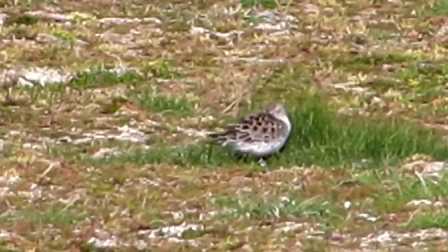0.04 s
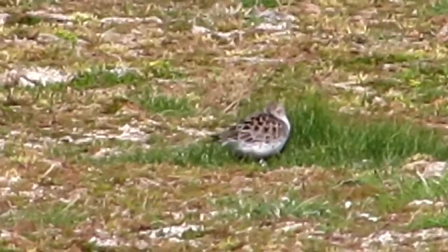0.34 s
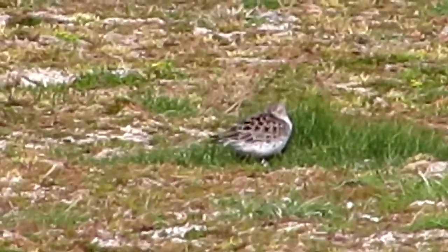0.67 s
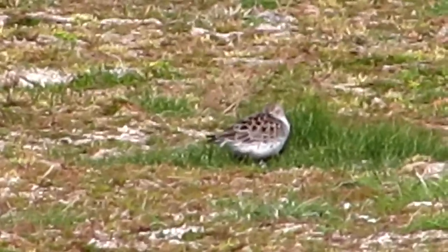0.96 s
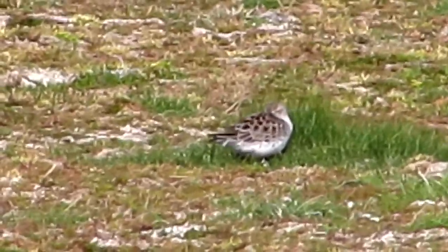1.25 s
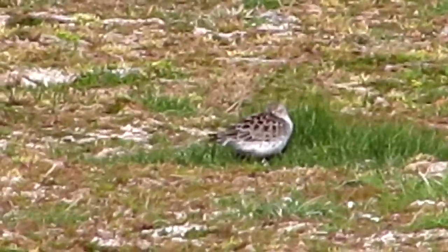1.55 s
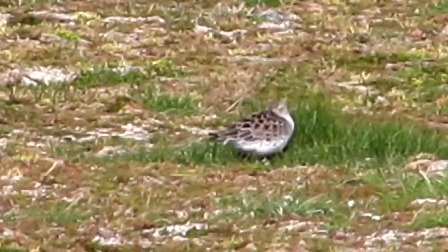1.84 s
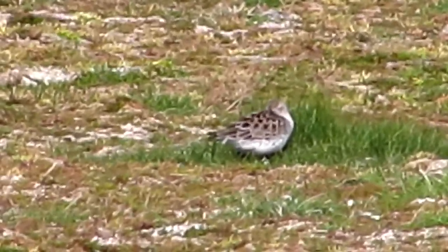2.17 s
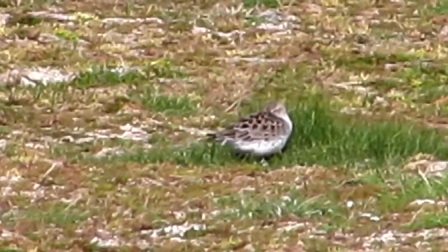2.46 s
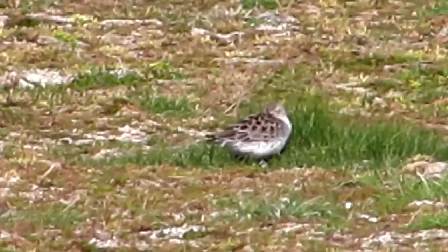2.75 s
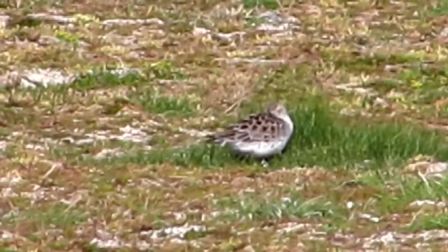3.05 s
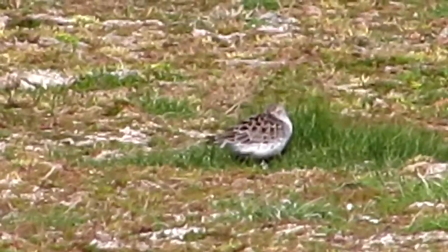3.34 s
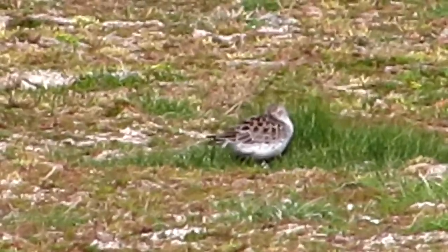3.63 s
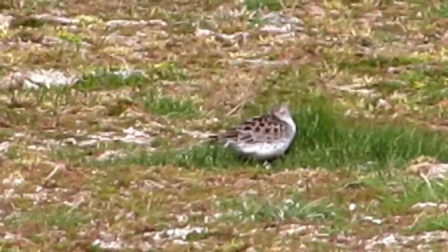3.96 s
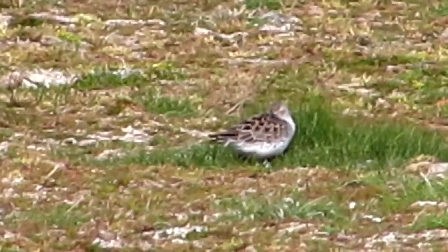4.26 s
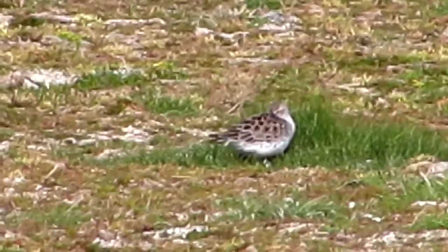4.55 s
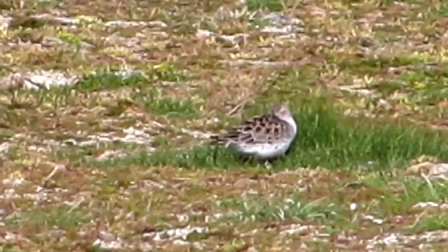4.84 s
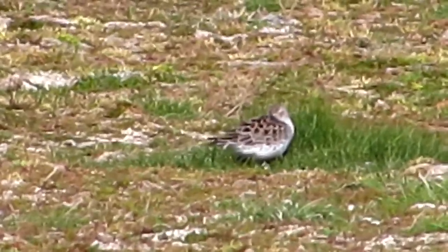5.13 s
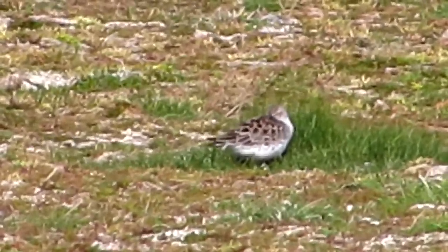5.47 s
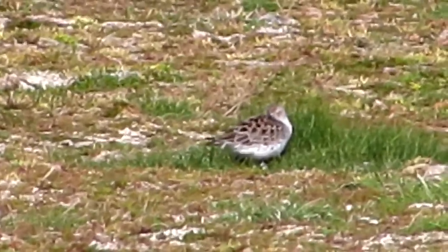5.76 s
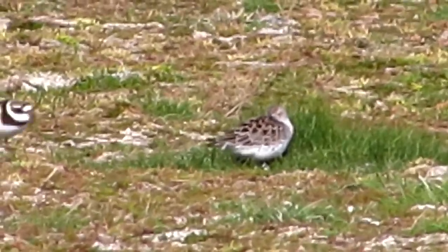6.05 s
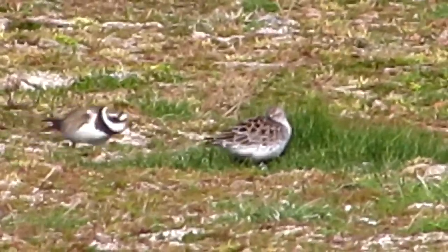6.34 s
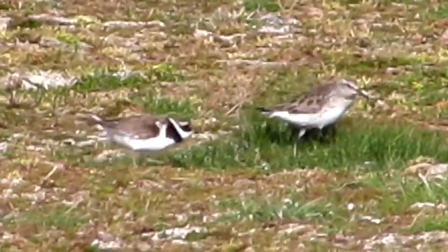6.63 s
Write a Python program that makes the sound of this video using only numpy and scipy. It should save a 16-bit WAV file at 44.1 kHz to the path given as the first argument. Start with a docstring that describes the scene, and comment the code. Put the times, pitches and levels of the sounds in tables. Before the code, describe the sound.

Uneven wind rumble slaps and crackles on the microphone, drops briefly to faint hiss and far twitters, then returns.

```python
"""Gusty wind buffets a camera's stereo microphone on open, short-grazed ground.
From the start, gusts ride on a light breeze. Their eddies (swirls of air) push the two channels in
opposite directions; small ones pop and crackle, hard ones slap, amid a few soft rustles and ticks.
Near 2.7 s the wind drops, and a faint hiss and far birds come through. The gusts soon return,
land their hardest slap near 3.7 s and blow on until they ease at the very end."""
import sys
import numpy as np
from scipy import signal
from scipy.fft import rfft, irfft
from scipy.io import wavfile
from scipy.ndimage import uniform_filter1d, minimum_filter1d, map_coordinates

SR = 44100
rng = np.random.default_rng(int(sys.argv[2]) if len(sys.argv) > 2 else 0)


def inscribe(sig):
    """Save sig as 16-bit PCM at rate SR to the path in sys.argv[1].

    A 1-D sig is mono; a 2-D sig holds one channel per row.
    Samples are clipped to [-1, 1] before scaling.
    """
    pcm = np.round(np.clip(np.atleast_2d(sig).T, -1, 1) * 32767)
    wavfile.write(sys.argv[1], SR, pcm.astype(np.int16))


N = 295470
TIME = np.arange(N) / SR

# Tight eddies that hit the microphone's openings head on: t/s, level/dB, corner f/Hz
# (the higher the corner frequency, the brighter the sound)
SLAPS = [(0.31, -9, 467), (0.36, -5.5, 332), (0.467, -9.5, 421), (0.483, -8.5, 359), (0.553, -3.5, 268.3),
         (0.574, -4.5, 325), (0.71, -12.5, 535.2), (0.832, -6, 378.3), (0.852, -4, 170.4),
         (0.84, -6.5, 700.8), (0.922, -11.5, 582), (1.022, -9.0, 116.6), (1.07, -8.5, 437.4),
         (1.266, -13, 380.6), (1.338, -16, 339), (1.366, -18, 300), (1.427, -18, 329.9),
         (1.552, -17.5, 189.3), (1.726, -11.5, 285.8), (1.806, -11.5, 285.7), (1.864, -9, 400.4),
         (1.928, -5.5, 418.9), (1.982, -10, 690.4), (2.061, -6.0, 514.4), (2.073, -7.5, 680),
         (2.205, -12.5, 369.5), (2.57, -13, 347), (3.062, -17.5, 188.8), (3.284, -15, 250.8),
         (3.309, -5, 316.7), (3.447, -3, 307.9), (3.533, -6.5, 359.8), (3.57, -6.5, 380.8),
         (3.657, 0.5, 176), (3.66, -1.5, 444.5), (3.677, -9.5, 488.3), (3.821, -12.5, 386.5),
         (3.9, -7.5, 373.2), (3.954, -11.5, 540), (4.017, -7.0, 153.7), (4.066, -13.0, 368.6),
         (4.259, -3, 420.8), (4.283, -7.5, 327), (4.338, -16, 599), (4.469, -6, 511.4),
         (4.518, -10.5, 421.1), (4.647, -9, 426.6), (4.69, -6.5, 524.5), (4.759, -8.0, 284.5),
         (4.871, -2, 229.9), (4.914, -6.5, 726), (5.012, -4.5, 520), (5.104, -7.5, 544.3),
         (5.259, -6.0, 460.4), (5.319, -14, 801.2), (5.435, -1.5, 679.3), (5.638, -10, 563.2),
         (5.768, -12.5, 394.2), (5.822, -8, 129.5), (5.888, -6.0, 596.3), (5.943, -8.0, 491.2),
         (6.034, -7, 90), (6.073, -7.5, 499), (6.16, -6.5, 649.3), (6.213, -10.5, 475.4),
         (6.332, -11, 382.1), (6.421, -9.5, 436.9), (6.491, -12.5, 442.7), (6.515, -11.5, 492.9),
         (6.598, -18, 263)]


def amp(db):
    """Turns decibels into a gain."""
    return 10 ** (np.asarray(db) / 20)


def unit(x):
    """Scales a signal to an average power of one."""
    return x / np.sqrt(np.mean(x ** 2) + 1e-20)


def curve(rows):
    """Joins (time, value) points with straight lines."""
    return np.interp(TIME, *np.transpose(rows))


def flutter(slow_hz, fast_hz):
    """Random wavering between two rates, with its extremes rounded off."""
    hz = np.fft.rfftfreq(N, 1 / SR)
    shape = hz / (hz ** 2 + slow_hz ** 2) ** 0.791 * np.exp(-(hz / fast_hz) ** 2)
    wavering = unit(irfft(rfft(rng.standard_normal(N)) * shape, N))
    return 2 * np.tanh(wavering / 2)


def filtered(x, hz, kind, order):
    """Keeps the "low" or the "high" side of a frequency."""
    return signal.sosfilt(signal.butter(order, min(hz, .49 * SR), kind, fs=SR, output="sos"), x)


def stereo_noise(spectrum, width):
    """Steady noise shaped by (f/Hz, level/dB) points; width sets how unlike left and right are."""
    hz, db = np.transpose(spectrum)
    shape = amp(np.interp(np.log(np.fft.rfftfreq(N, 1 / SR) + 1), np.log(hz), db))
    mid, side = [unit(irfft(rfft(rng.standard_normal(N)) * shape, N)) for _ in range(2)]
    return np.array([mid + width * side, mid - width * side])


def air():
    """Faint hiss of the open ground, with a far drone in it."""
    # Tone of the hiss, with a peak for the drone: f/Hz, level/dB
    spectrum = [(100, 1), (600, -1), (740, -1.5), (860, 9), (1030, -3.5), (1900, -7.5), (3400, -11),
                (4000, -16.5), (4800, -13), (7000, -17.5), (8000, -20), (11000, -20), (13500, -25),
                (15500, -44)]
    # Slow rise and fall of the hiss: t/s, level/dB
    levels = [(0, -70), (1.0, -78), (1.2, -72.5), (2.0, -69.5), (2.7, -73), (3.5, -71.5), (4.5, -79),
              (5.2, -78), (5.7, -72), (6.7, -72.5)]
    return amp(curve(levels) + flutter(slow_hz=4, fast_hz=15)) * stereo_noise(spectrum, width=0.74)


def glide(hz, fade):
    """A tone that follows a changing pitch, fading in and out."""
    return unit(np.sin(2 * np.pi * np.cumsum(hz) / SR) * signal.windows.tukey(len(hz), fade))


def birds(whistle_db=-72.5, twitter_db=2.5, echo_db=-5.5, echo_s=.2):
    """Buzzy twitters and one clear whistle off to the left, blurred by distance."""
    # Short sliding notes: t/s, length/s, level/dB, buzz/share of pitch, start f/Hz, end f/Hz
    notes = [(2.533, 0.11, -81, 0.065, 4836, 4207), (2.863, .13, -82.5, .012, 3660, 3190),
             (2.97, 0.048, -79, 0.021, 2185, 2071), (3.035, 0.032, -76, 0.013, 2352, 2347),
             (3.131, 0.024, -75.5, 0.05, 2280, 2450), (3.235, 0.062, -82, .006, 1780, 1800),
             (3.359, 0.025, -72.5, 0.021, 2603, 2345), (3.377, .042, -74, 0.013, 2170, 2020),
             (3.485, 0.045, -81.5, 0.044, 4650, 4472), (3.63, 0.044, -81, 0.038, 4891, 4653),
             (4.109, 0.045, -78, 0.0096, 1755, 2030), (4.528, 0.043, -81, .015, 3104, 3090),
             (4.693, .035, -78.5, 0.045, 4792, 4729), (5.635, 0.073, -77.5, .11, 4658, 5070)]
    # A whistle that rises, then slides down: t/s, f/Hz
    whistle = [(3.23, 3375), (3.262, 3658), (3.292, 3730), (3.315, 3200), (3.36, 3010), (3.44, 2830)]
    song = np.zeros(N)
    wobble = flutter(slow_hz=90, fast_hz=300)
    for start, length, db, buzz, start_hz, end_hz in notes:
        hz = np.linspace(start_hz, end_hz, round(length * SR))
        at = round(start * SR) + np.arange(len(hz))
        song[at] += amp(db) * glide(hz * (1 + buzz * wobble[at]), fade=.5)
    song *= amp(twitter_db * flutter(slow_hz=40, fast_hz=90))  # breaks the notes into syllables
    calling = (TIME > whistle[0][0]) & (TIME < whistle[-1][0])
    song[calling] += amp(whistle_db) * glide(curve(whistle)[calling], fade=.4)
    t = TIME[:SR // 2]
    scatter = rng.standard_normal((2, len(t))) * np.exp(-np.log(1000) * t / echo_s)
    echo = signal.fftconvolve(song[None], scatter / np.linalg.norm(scatter[0]), axes=1)[:, :N]
    return song * amp([[2], [-8]]) + amp(echo_db) * echo


def rustles(grain_db=3.5):
    """Soft rustles near the camera: short swells of grainy high noise."""
    # Swells: middle t/s, level/dB, half length/s
    swells = [(0.144, -68.5, 0.016), (0.307, -68.5, 0.0063), (0.446, -61, 0.029), (0.55, -70.5, 0.02),
              (2.904, -77, 0.071), (5.422, -65.5, 0.034), (5.869, -77, 0.028)]
    # Their tone: f/Hz, level/dB
    spectrum = [(800, -10.0), (2500, 5.5), (4500, 0.5), (6300, 0.5), (7800, -12.0), (10000, -7.5),
                (13000, -14.5), (15500, -36)]
    loudness = sum(amp(db) * np.exp(-.5 * ((TIME - when) / half) ** 2) for when, db, half in swells)
    grain = amp(grain_db * flutter(slow_hz=40, fast_hz=300))
    return loudness * grain * stereo_noise(spectrum, width=0.41)


def ticks(decay_s=0.00025, fizz_db=-16):
    """Hard wind or a touch on the camera makes dry clicks: a sharp edge and a brief fizz."""
    # Clicks: t/s, level before filtering/dB, treble limit f/Hz, left minus right/dB
    clicks = [(0.84, -16.5, 2990, 16.5), (0.923, -23, 2800, 15), (1.452, -42, 10900, 6),
              (1.982, -29, 2500, -16), (2.073, -16.5, 2780, 8), (3.657, -28, 5900, 3),
              (3.66, -32.5, 8800, -12), (4.484, -40, 4309, -8), (4.871, -37.5, 12240, -0.5),
              (4.914, -22, 3891, 14), (5.259, -43, 5880, -2), (5.435, -19.5, 3804, -16)]
    out, t = np.zeros((2, N)), TIME[:SR // 100]
    for start, db, bright_hz, pan_db in clicks:
        fizz = amp(fizz_db) * np.exp(-t / decay_s) * rng.standard_normal((2, len(t)))
        click = filtered((t == 0) + fizz, bright_hz, "low", order=4)
        pan = amp([[pan_db / 2], [-pan_db / 2]])
        out[:, round(start * SR):][:, :len(t)] += amp(db) * pan * click
    return out


def puff(t, start, hold, attack, release):
    """The strength of one push of air: it rises, holds and dies away."""
    return np.clip((t - start) / attack, 0, 1) * np.exp(-np.maximum(t - start - hold, 0) / release)


def flow(breeze_hz=316, breeze_ref_db=-25, sputter_db=2.0, gust_rise_s=.019,
         wake_db=-14, wake_rise_s=.004, wake_speed=1.1):
    """Breeze, gusts and the rough wake behind each slap add up to one (pressure/dB, corner f/Hz)."""
    # The breeze between gusts: t/s, pressure level/dB
    breeze = [(0, -31), (.3, -28), (.75, -27), (1.2, -29), (1.45, -33), (1.68, -35), (2.05, -25),
              (2.58, -32), (2.74, -52), (2.83, -39.5), (3.25, -35.5), (3.55, -24), (3.82, -28), (4.13, -32),
              (4.5, -24.5), (5.3, -24.5), (5.75, -27.5), (6.1, -23.5), (6.57, -34), (6.7, -30.5)]
    # Gusts sweeping over the microphone: t/s, hold/s, pressure level/dB, corner f/Hz
    gusts = [(0.0, 0.038, -28.5, 324.4), (0.045, 0.11, -23, 312), (0.205, 0.069, -24.5, 353.5),
             (0.285, 0.16, -19.5, 388.5), (0.466, 0.04, -16.5, 489.8), (0.55, 0.065, -18.0, 459.4),
             (0.635, 0.061, -25.5, 259), (0.697, 0.069, -19.5, 315.8), (0.799, 0.14, -20.5, 498.1),
             (0.946, 0.098, -22.0, 372.8), (1.045, 0.088, -21.5, 452.9), (1.172, 0.044, -26.5, 375.3),
             (1.267, 0.041, -22.0, 416.5), (1.722, 0.09, -25.5, 225.6), (1.86, 0.14, -16, 376.6),
             (2.048, 0.1, -18.5, 426), (2.16, 0.076, -23.0, 261.3), (2.231, 0.14, -23.5, 233),
             (2.423, 0.078, -21, 304.9), (2.506, 0.068, -23, 279.6), (2.934, 0.026, -24.5, 124.8),
             (3.015, 0.061, -26.5, 134.7), (3.123, 0.058, -27.5, 135.1), (3.296, 0.033, -16, 349.8),
             (3.374, 0.0563, -19.5, 193.9), (3.445, 0.11, -19.5, 317.6), (3.609, 0.027, -18.5, 381),
             (3.653, 0.026, -22.0, 520.5), (3.718, 0.043, -19.0, 459.3), (3.873, 0.049, -24.5, 460.7),
             (3.936, 0.094, -20.0, 388.7), (4.185, 0.052, -14.5, 429.7), (4.248, 0.075, -22.5, 400.3),
             (4.368, 0.039, -23.5, 392.7), (4.438, 0.073, -20.5, 395.8), (4.508, 0.1279, -20.0, 344.7),
             (4.662, 0.047, -17.5, 539.4), (4.75, 0.1, -19.5, 548.7), (4.967, 0.018, -23, 640.5),
             (5.006, 0.091, -20.0, 560.8), (5.136, 0.057, -26.5, 441.7), (5.214, 0.087, -22, 720),
             (5.394, 0.14, -19.5, 801.4), (5.539, 0.14, -23.0, 448.9), (5.817, 0.041, -20, 370.6),
             (5.944, 0.06, -21, 544), (6.017, 0.16, -20.5, 489.9), (6.235, 0.038, -22.0, 610.1),
             (6.3, 0.069, -26.5, 485.3), (6.409, 0.028, -27.5, 460.5), (6.48, 0.059, -25.5, 389.1),
             (6.644, 0.055, -31, 206.4)]
    speed_power = .88  # more pressure means faster air and a brighter rumble
    ebb_power = .55  # a dying gust keeps its brightness longer than its force
    step = 20
    t = TIME[::step]
    breeze_db = (curve(breeze) + sputter_db * flutter(slow_hz=12.19, fast_hz=25.16))[::step]
    parts = [(amp(breeze_db), breeze_hz * amp(breeze_db - breeze_ref_db) ** speed_power)]
    for start, hold, db, hz in gusts:
        push = puff(t, start - gust_rise_s / 2, hold + gust_rise_s / 2, gust_rise_s, release=.022)
        parts.append((amp(db) * push, hz * push ** np.where(t < start + hold, speed_power, ebb_power)))
    for when, db, hz in SLAPS:
        push = puff(t, when - wake_rise_s, hold=.009, attack=wake_rise_s, release=.0097)
        parts.append((amp(db + wake_db) * push, wake_speed * hz * push ** speed_power))
    pressure, corner_hz = np.transpose(parts, (1, 0, 2))
    power = pressure ** 2
    total_db = 10 * np.log10(power.sum(0))
    mean_hz = np.average(corner_hz, axis=0, weights=power)
    return np.interp(TIME, t, total_db), np.interp(TIME, t, mean_hz)


def pops(pressure_db, corner_hz, count=330, over_db=4.0, range_db=6.5, speed=0.97, speed_range_db=4.0):
    """Small eddies at random times, stronger and faster when the wind is; gives rows like SLAPS."""
    when, strength, tightness = rng.random((count, 3)).T
    at = (when * (N - 1)).astype(int)
    db = pressure_db[at] + over_db + range_db * strength ** 2
    hz = speed * corner_hz[at] * amp(speed_range_db * tightness)
    return list(zip(TIME[at], db, hz))


def crackle(eddies, snap_db=-37.0, snap_hz=4600, hard_hz=500, steepness=1.4):
    """Fast eddies overload the microphone for an instant: fine snaps, uneven between left and right."""
    out = np.zeros((2, N))
    for (when, db, corner_hz), left in zip(eddies, rng.random(len(eddies))):
        hardness = min(corner_hz / hard_hz, 1) ** steepness
        out[:, round(when * SR)] += amp(db + snap_db) * hardness * 2 * np.array([left, 1 - left])
    return filtered(out, snap_hz, "low", order=3)


def slaps(eddies, opposed_db=-1.0, common_db=-12.0, common_speed=0.84):
    """Each passing eddy gives one lopsided swing of pressure, as (opposed, common) parts."""
    out = np.zeros((2, N))
    for (when, db, corner_hz), phase in zip(eddies, rng.random((len(eddies), 2))):
        middle = round(when * SR)
        near = slice(max(middle - SR // 50, 0), middle + SR // 50)
        passage = np.pi * corner_hz * (TIME[near] - when) * np.array([[1.5], [1.808 * common_speed]])
        swing = (np.exp(2j * np.pi * phase[:, None]) / (1 - 1j * passage) ** 2).real
        out[:, near] += amp(db) * amp([[opposed_db], [common_db]]) * swing
    return out


def rumble(corner_hz, eddy_samples=64, count=2 ** 19):
    """A frozen pattern of eddies slides past the microphone: the faster it goes, the brighter it is."""
    travel = np.cumsum(corner_hz) / SR * eddy_samples
    fineness = np.fft.rfftfreq(count, 1 / eddy_samples)
    pattern = unit(irfft(rfft(rng.standard_normal(count)) * np.exp(-fineness)))  # small eddies are weak
    return map_coordinates(pattern, [travel % (count - 1)], order=3)


def buffeting(pressure_db, corner_hz, surge_db=1.0, surge_speed_db=0.29, churn_db=3.5,
              churn_speed_db=0.7949, opposed_db=0.8, common_db=-14.5, speed=.8, common_speed=1.27):
    """Rough air makes an unsteady rumble, as (opposed, common) parts."""
    surge = flutter(slow_hz=12.96, fast_hz=17.62)  # large eddies make the flow swell and slacken
    churn = flutter(slow_hz=32.63, fast_hz=275.4)  # quick spurts, louder and brighter at once
    spurts = churn + .22 * (churn ** 2 - 1)  # a few are much faster than the rest
    force = amp(pressure_db + surge_db * surge + churn_db * churn)
    corner_hz = corner_hz * amp(surge_speed_db * surge + churn_speed_db * spurts)
    return np.array([amp(opposed_db) * force * rumble(speed * corner_hz),
                     amp(common_db) * force * rumble(common_speed * corner_hz)])


def wind(low_cut_hz=39, top_hz=3750, leak_db=-16, opposed_top_hz=3000):
    """Wind at the microphone's openings, which hold back the slowest swings and the finest eddies."""
    pressure_db, corner_hz = flow()
    small_eddies = pops(pressure_db, corner_hz)
    pressure = buffeting(pressure_db, corner_hz) + slaps(small_eddies)
    body = filtered(pressure, top_hz, "low", order=5)
    body = filtered(body[:, ::-1], top_hz, "low", order=5)[:, ::-1]  # again backwards, to undo the delay
    pressure = body + amp(leak_db) * (pressure - body) + slaps(SLAPS)  # head-on slaps keep their crack
    # The opposed part pushes left and right opposite ways; the common part moves them together.
    opposed, common = filtered(pressure, low_cut_hz, "high", order=2)
    opposed = filtered(opposed, opposed_top_hz, "low", order=1)  # fine eddies oppose the channels less
    stereo = np.array([(common + opposed) * amp(0.47), (common - opposed) * amp(1.0)])
    return stereo + crackle(SLAPS + small_eddies)


def scene():
    """Wind on the microphone over a quiet field."""
    return wind() + air() + rustles() + ticks() + birds()


def record(dry, top_hz=15800):
    """A fast limiter turns the strongest slaps down to full scale; then the highest treble is cut."""
    safe_gain = 1 / np.maximum(abs(dry).max(0), 1)
    held_gain = minimum_filter1d(safe_gain, size=241)
    smooth_gain = uniform_filter1d(uniform_filter1d(held_gain, size=121), size=121)
    treble_cut = signal.firwin(511, top_hz, window=("kaiser", 9), fs=SR)
    return signal.oaconvolve(dry * smooth_gain, treble_cut[None], "same")


dry = scene()
out = record(dry)
inscribe(out)
```